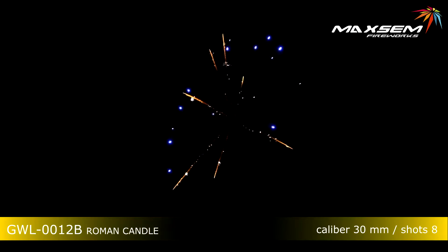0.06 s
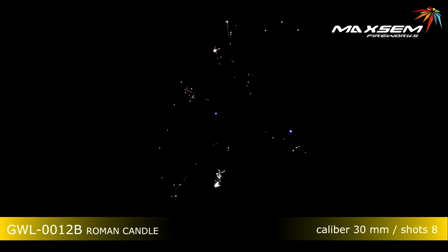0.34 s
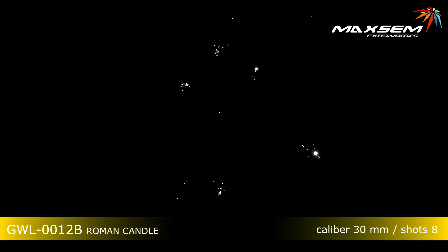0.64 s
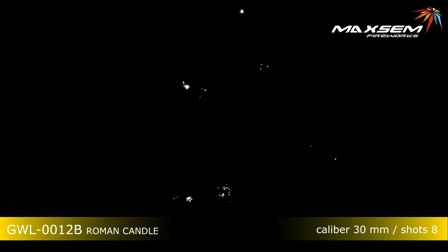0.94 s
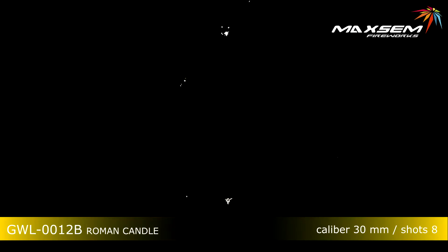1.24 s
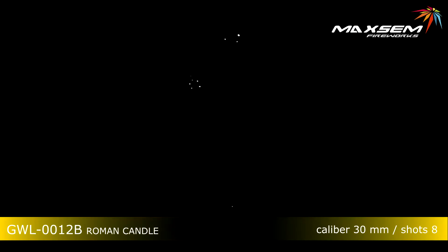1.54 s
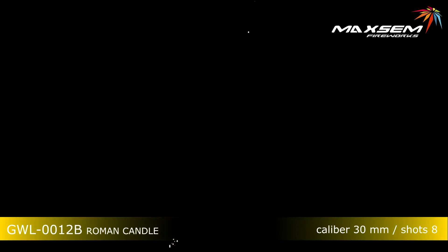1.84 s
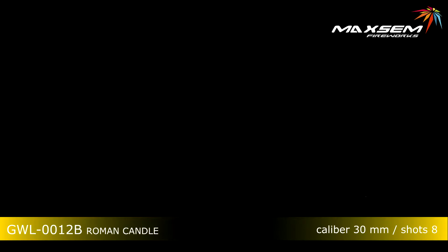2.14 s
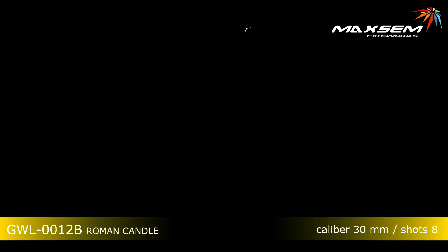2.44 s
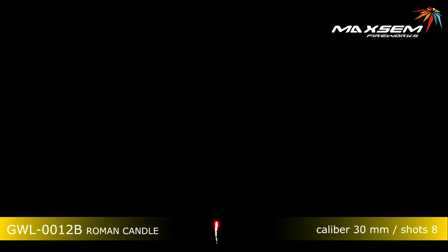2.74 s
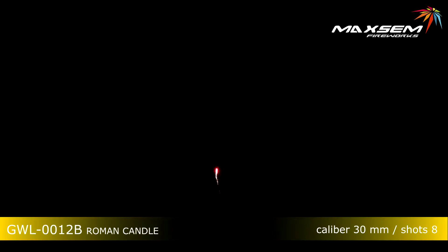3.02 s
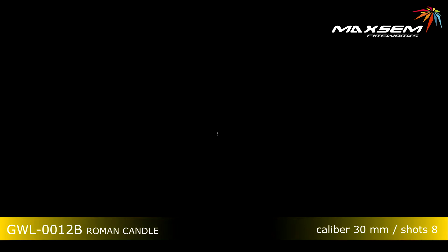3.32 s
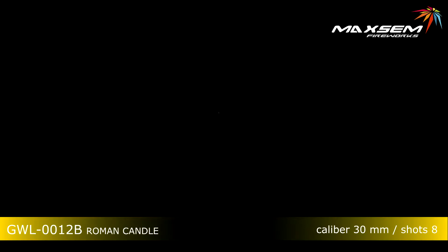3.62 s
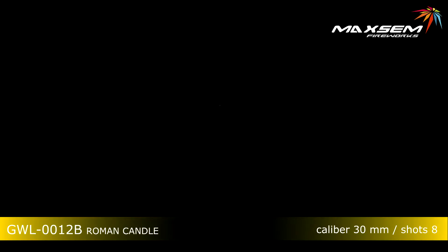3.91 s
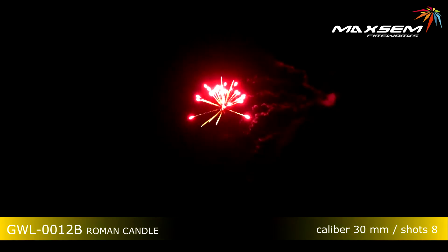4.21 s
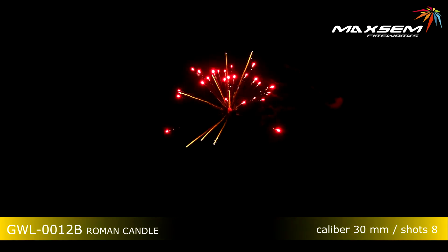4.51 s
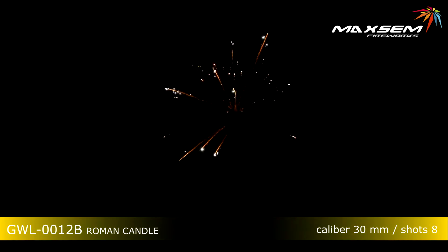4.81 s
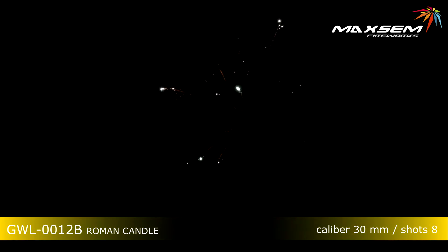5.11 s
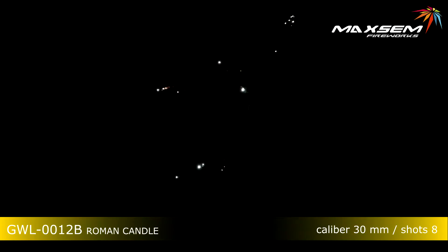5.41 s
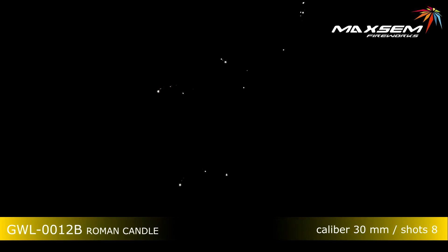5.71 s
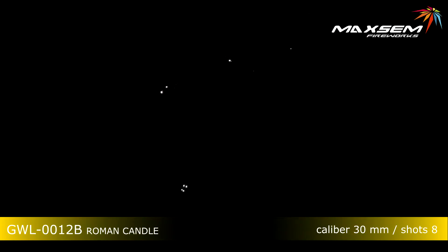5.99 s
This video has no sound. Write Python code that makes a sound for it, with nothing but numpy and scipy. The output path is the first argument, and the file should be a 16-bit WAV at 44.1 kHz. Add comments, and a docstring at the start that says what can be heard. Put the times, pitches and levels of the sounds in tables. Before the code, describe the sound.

The sound opens outdoors at night on the rolling echo of a firework that has just burst. Its stars fizz and crackle in sharp, irregular snaps, thickest around 1 second and thinning out by about 2 seconds. At 2.4 seconds a roman candle fires its next shot with a ringing snap, a thump and a brief rush of gas, followed by a short echo. One last loud crack comes at 2.7 seconds. A lull follows, with a few faint distant pops around 3 and 4 seconds. At 4.4 seconds the shell bursts overhead with a loud bang that rolls away across the land. Its stars fizz softly from about 4.7 seconds and fade by 6, without crackling. Underneath lies a quiet, steady outdoor hum, with very faint insect-like chirps in the second half. The single microphone overloads on the bangs and feeds only the right channel.

```python
"""A roman candle outdoors at night. Over the murmur of the land, a shell that has just burst rolls away
while its stars fizz and crackle, each crack a tiny shock wave. At 2.4 s the tube fires the next shot:
a ringing snap, a thump and a rush of gas. Two seconds later that shell bursts overhead, echoes off the
land and leaves its stars fizzing, with faint insect-like chirps underneath.
One microphone, overloaded by the bangs, feeds the right channel only."""
import sys
import numpy as np
from scipy import signal
from scipy.io import wavfile

SR = 44100
rng = np.random.default_rng(int(sys.argv[2]) if len(sys.argv) > 2 else 0)


def to_wav(s):
    """Save 16-bit WAV."""
    ch = np.atleast_2d(s).T  # columns
    pcm = np.round(np.clip(ch, -1, 1) * 32767)  # PCM
    wavfile.write(sys.argv[1], SR, pcm.astype(np.int16))


N = 271215

# Levels are mix settings ahead of the preamp; a spectrum sets tone colour only.
# murmur of the open land: f/Hz, level/dB
NIGHT_SPECTRUM = [(25, -19), (82, -2.5), (111, -8), (340, -7.5), (545, -6.5), (900, -3.5), (1250, -9.5),
                  (1560, -8), (2200, -24.5), (5000, -41), (6400, -32.5), (7600, -38.5), (16000, -43)]
# shell bursts, the first just before the scene opens: t/s, roll level/dB, fizz level/dB
SHELL_BURSTS = [(-.255, -21, -34), (4.3892, -23, -37)]
# rolling echo from near slopes: f/Hz, level/dB
NEAR_ROLL_SPECTRUM = [(40, -32), (118, -16.5), (170, -6.5), (300, -9.5), (430, -5.5), (620, -11.5),
                      (780, -22.5), (1400, -20), (1900, -32.5), (4400, -24.5), (5000, -28), (6600, -29),
                      (11600, -41), (16000, -58)]
# tones that stand out in the near roll: f/Hz, width/octaves, boost/dB
NEAR_ROLL_PEAKS = [(252, 0.12, 8.5), (531.4, 0.038, 6), (1350, 0.06, 2.5)]
# rolling echo from far slopes: f/Hz, level/dB
FAR_ROLL_SPECTRUM = [(40, -22), (130, -3), (230, 1.5), (350, -3.5), (550, 2), (780, -7), (1000, -4),
                     (1150, -13), (1430, -1.5), (1900, -17.5), (4400, -17.5), (5000, -28.5), (6500, -23),
                     (16000, -44.5)]
# fizz of burning stars: f/Hz, level/dB
FIZZ_SPECTRUM = [(600, -24.5), (1100, 1.5), (1500, -1), (1900, -3.5), (3000, -2.5), (4400, -4), (5000, -9),
                 (6500, -9), (10000, -23), (16000, -42.5)]
# loud cracks of the stars: t/s, level/dB
STAR_CRACKS = [(0.0806, -24), (0.1975, -10.0), (0.2386, -14.5), (0.2683, -16.0), (0.391, -12.0),
               (0.4075, -14), (0.4231, -9), (0.4563, -16.5), (0.464, -12), (0.4771, -12.5), (0.5414, -10.0),
               (0.5475, -5), (0.6022, -15.0), (0.6269, -9), (0.6561, -9), (0.673, -6), (0.696, -9),
               (0.7433, -14), (0.7561, -5), (0.7757, -5), (0.7859, -5), (0.7938, -7.5), (0.8131, -4.5),
               (0.855, -9), (0.8993, -8.5), (0.9092, -9), (0.9161, -4), (0.9367, -10), (0.9793, -2),
               (1.0073, -9), (1.0378, -10.0), (1.0463, -13.5), (1.0651, -3.0), (1.1022, -9), (1.117, -10.5),
               (1.1264, -10.5), (1.2291, -6), (1.245, -11.5), (1.2553, -2), (1.3451, -14), (1.3567, -14.5),
               (1.4902, -12.5), (1.5069, -6.5), (1.5595, -9.5), (1.5641, -8.5), (1.6965, -1.5),
               (1.774, -21.5), (1.9089, -15.5), (1.919, -10), (2.0027, -12.5), (2.0067, -3.5),
               (2.1446, -2.5), (2.657, -20.5), (2.7385, -2)]
# haze that grass and trees return after a crack: f/Hz, level/dB
HAZE_SPECTRUM = [(200, -10.5), (1000, 13), (2000, 1.5), (4200, -0.5), (5000, -5), (6500, -4.5), (10000, -4),
                 (16000, -17)]
# hissy slaps of a crack off tree lines: delay/s, level/dB, half-width/s
CRACK_SLAPS = [(.265, -69, .035), (.554, -67, .025)]
# diffuse slaps of a burst off far tree lines: delay/s, level/dB, f/Hz, half-width/s
BURST_SLAPS = [(.052, -21.5, 315, 0.015), (0.093, -42, 6000, 0.016), (.158, -27.5, 300, .04),
               (.15, -33, 814, 0.053), (.42, -33, 1000, 0.023), (.454, -33, 710, 0.014),
               (1.43, -49.5, 496, 0.082)]
# brief ring of the crack at the muzzle: f/Hz, level/dB, t60/s
MUZZLE_RING = [(3700, -7.5, .012), (4400, 1, .012), (5315, -11, .014)]
# echo of the launch from things nearby: f/Hz, level/dB
LAUNCH_ECHO_SPECTRUM = [(50, -19), (130, -7.5), (215, 0), (400, -17), (580, -7.5), (783, -12), (1540, -12),
                        (2210, -16.5), (4450, -14.5), (10900, -35.5), (16000, -51.5)]
# diffuse slaps of the launch: delay/s, level/dB, f/Hz, half-width/s
LAUNCH_TREE_SLAPS = [(.115, -41, 200, 0.038), (.07, -45.5, 560, 0.022), (0.48, -49.5, 1150, 0.058)]
# faint pops far away: t/s, level/dB, f/Hz, t60/s
DISTANT_POPS = [(2.89, -32, 3370, 0.011), (3.005, -37.5, 616, 0.04), (3.922, -42, 560, 0.2),
                (3.949, -43, 730, 0.086), (4.026, -37, 1300, 0.036)]
# thin chirps: t/s, level/dB
THIN_CHIRPS = [(3.736, -71.5), (4.201, -71.5), (5.064, -68), (5.312, -73), (5.57, -71), (5.95, -69)]
# the two bands of a chirp: low f/Hz, high f/Hz, level/dB
CHIRP_BANDS = [(6200, 6900, 2.5), (11000, 12700, -6)]
# a burst's shock wave, direct, off the ground and off far obstacles:
# delay/s, level/dB, length/s, low-pass f/Hz
SHOCK_PATHS = [(0, 8.5, 0.0016, 9200), (.0033, -8.5, 0.00186, 1490), (.0076, 13.5, 0.00177, 5030),
               (0.0103, 0, 0.00255, 2500), (0.065, -10, 0.0028, 1800), (.081, -12.5, .0035, 3980),
               (.168, -25, 0.0031, 910), (.191, -15, 0.00267, 1000)]

LAUNCH_S = 2.4013


def from_db(db):
    """Decibels to gain."""
    return 10 ** (np.asarray(db) / 20)


def rms_one(x):
    """Scale to rms 1."""
    return x / np.sqrt(np.mean(x ** 2) + 1e-20)


def since(s):
    """Seconds elapsed since a cue, for every sample."""
    return np.arange(N) / SR - s


def cut(x, hz, kind, order=2):
    """Butterworth filter."""
    sections = signal.butter(order, np.clip(hz, 10, .45 * SR), kind, fs=SR, output="sos")
    return signal.sosfilt(sections, x + 1e-18)


def add(out, s, sound):
    """Mix in a short sound at its cue; cues before time zero are skipped."""
    i = round(s * SR)
    if i >= 0:
        out[i:i + len(sound)] += sound[:N - i]


def noise(spectrum, start_s=0, dulling=0, peaks=()):
    """Coloured noise that darkens from start_s on, by `dulling` dB per kHz each second."""
    hz, s, frames = signal.stft(rng.standard_normal(N), SR, nperseg=2048)
    octave, points = np.log2(hz + 1), np.array(spectrum)
    db = np.interp(octave, np.log2(points[:, 0]), points[:, 1])
    for peak_hz, width, peak_db in peaks:
        db = db + peak_db * np.exp(-((octave - np.log2(peak_hz)) / width) ** 2)
    loss_db = dulling * np.outer(hz / 1000, np.maximum(s - start_s, 0))
    gain = rms_one(from_db(db))[:, None] * from_db(-loss_db)
    return signal.istft(frames * gain)[1][:N]


def tail(s, rise_s, db_per_decade, db_per_s=0):
    """Envelope: a linear attack, then a fall with each tenfold of time and an optional steady fade."""
    t = np.maximum(since(s), 0)
    age = t / rise_s
    return np.minimum(age, 1) * from_db(-db_per_decade * np.log10(np.maximum(age, 1)) - db_per_s * t)


def flutter(depth_db, rate_hz):
    """Random swelling and sinking of a level."""
    return from_db(depth_db * rms_one(cut(rng.standard_normal(N), rate_hz, "low")))


def puff(t, band_hz, db, t60):
    """Band noise with an instant attack that dies away."""
    return rms_one(cut(rng.standard_normal(len(t)), band_hz, "band")) * from_db(db - 60 * t / t60)


def swell(s, db, band_hz, half_width_s):
    """Band noise that fades in and out around a cue."""
    band = rms_one(cut(rng.standard_normal(N), band_hz, "band"))
    return from_db(db) * band * np.exp(-(since(s) / half_width_s) ** 2)


def n_wave(t, length_s):
    """A shock wave: pressure jumps up, falls through zero and jumps back."""
    phase = np.clip(t / length_s, 0, 1)
    return np.diff(phase * (1 - phase), prepend=0) * length_s * SR   # mean pressure over each sample


def ring(x, hz, t60):
    """A resonator: a click sets a decaying sine ringing."""
    r, w = from_db(-60 / (t60 * SR)), 2 * np.pi * hz / SR
    return signal.lfilter([0, np.sin(w)], [1, -2 * r * np.cos(w), r * r], x + 1e-18)


def night():
    """The bed: a steady, distant murmur of open land."""
    return from_db(-52) * noise(NIGHT_SPECTRUM)


def roll(burst_s, level_db, near_s=.54):
    """Echoes pile into a lumpy roll as more land answers, then sink as far slopes take over from near."""
    near_share = np.exp(-(since(burst_s) / near_s) ** 2)
    near = np.sqrt(near_share) * noise(NEAR_ROLL_SPECTRUM, burst_s, dulling=1, peaks=NEAR_ROLL_PEAKS)
    far = np.sqrt(1 - near_share) * noise(FAR_ROLL_SPECTRUM, burst_s, dulling=1.57)
    envelope = from_db(level_db) * tail(burst_s, rise_s=.078, db_per_decade=21.5)
    return envelope * (near + far) * flutter(depth_db=2, rate_hz=74.2)


def burning(burst_s, level_db, catch_s=.28):
    """Envelope of the stars: they catch just after the burst, flare up and burn down."""
    return from_db(level_db) * tail(burst_s + catch_s, rise_s=.06, db_per_decade=7, db_per_s=10)


def fizz(burst_s, level_db):
    """The burning stars fizz, duller as they fly apart."""
    hiss = noise(FIZZ_SPECTRUM, burst_s, dulling=1.76)
    return burning(burst_s, level_db) * hiss * flutter(depth_db=1.5, rate_hz=410)


def sparks(envelope, per_s, level_db):
    """Tiny grains pop at random, bright ticks that ride the given envelope."""
    sizes = from_db(5.8 * np.minimum(rng.exponential(1, N), 3))
    clicks = (rng.random(N) < per_s / SR) * sizes * envelope
    return from_db(level_db) * cut(clicks, [3000, 9000], "band")


def grains(climax_s=.8, half_width_s=.8):
    """Crackle cues (t/s, level/dB): a crack may set off a weaker grain, most surely at the climax."""
    cues = []
    for s, db in STAR_CRACKS:
        luck, wait_s, offset_db = rng.random(), rng.uniform(.0032, .011), rng.normal(-14.5, 3)
        cues.append((s, db))
        if luck < np.exp(-((s - climax_s) / half_width_s) ** 2):
            cues.append((s + wait_s, db + offset_db))
    return cues


def crackle(shock_s=.00012, gas_s=.00022, direct_db=.82, ground_db=-9):
    """Each grain explodes as a tiny shock wave with a puff of gas; the ground bounces it back."""
    out, t = np.zeros(N), np.arange(SR // 16) / SR
    for s, db in grains():
        bounce_s = .0078 - .0011 * s + .0008 * rng.standard_normal()   # ever sooner as the stars sink
        size, force = np.exp(rng.normal(0, [.15, .4]))
        gas = .15 * force * (1 - t / gas_s) * np.exp(-t / gas_s)
        snap = cut(n_wave(t, shock_s * size) + gas, 8700, "low")
        scatter = puff(t, [2600, 7500], db=-17.5, t60=.0086)   # off things close to the microphone
        crack = snap / np.abs(snap).max() + scatter
        # the ground scatters it longer, with more body
        grass = puff(t, [500, 1800], db=-17, t60=.038) + puff(t, [2200, 7000], db=-17, t60=.038)
        bounce = cut(crack, 6000, "low", order=1) + grass
        add(out, s, from_db(db + direct_db) * crack)
        add(out, s + bounce_s, from_db(db + ground_db) * bounce)
    return out


def land_echo(cracks):
    """Grass and trees send back a faint haze that dulls with distance, and two soft slaps."""
    envelope = from_db(-52) * tail(0, rise_s=.02, db_per_decade=14, db_per_s=2)
    haze = envelope * noise(HAZE_SPECTRUM, dulling=2.5)
    slaps = sum(swell(delay, db, [2800, 8900], width) for delay, db, width in CRACK_SLAPS)
    return signal.fftconvolve(cracks, (haze + slaps)[:SR])[:N]


def tree_slaps(bang_s, slaps):
    """Tree lines smear the echoes of a bang into swells of noise."""
    swells = sum(swell(bang_s + delay, db, [hz / 1.58, hz * 1.35], width)
                 for delay, db, hz, width in slaps)
    return (since(bang_s) > 0) * swells


def launch(gap_s=.001):
    """The lift charge: a ringing double crack at the muzzle, the thump and rush of gas leaving the tube."""
    out, t = np.zeros(N), np.arange(SR // 8) / SR
    click = signal.unit_impulse(len(t))
    crack = sum(from_db(db) * ring(click, hz, t60) for hz, db, t60 in MUZZLE_RING)
    tube_ring = from_db(-13) * ring(click, hz=1500, t60=.035)   # the air in the tube
    rush = puff(t, [300, 3500], db=-18, t60=.025)
    thump = from_db(-14) * ring(click, hz=230, t60=.035)   # the air column's low note
    push = from_db(-19) * cut(n_wave(t, length_s=.0049), 480, "low")   # expanding gas, bass only
    ground_scatter = puff(t, [200, 600], db=-30, t60=.08)
    add(out, LAUNCH_S, crack + tube_ring + ground_scatter)
    add(out, LAUNCH_S + gap_s, crack + rush - thump - push)
    return out


def launch_echo():
    """The surroundings answer the launch, brightening as they fade, while sparks spit from the tube."""
    envelope = from_db(-37.5) * tail(LAUNCH_S, rise_s=.076, db_per_decade=28.5)
    wash = noise(LAUNCH_ECHO_SPECTRUM, LAUNCH_S, dulling=-.5) * flutter(depth_db=2, rate_hz=220)
    slaps = tree_slaps(LAUNCH_S, LAUNCH_TREE_SLAPS)
    return envelope * wash + slaps + sparks(envelope, per_s=100, level_db=8.5)


def far_pops(band_ratio=1.28):
    """Faint pops in the distance, each a narrow puff of noise."""
    out, t = np.zeros(N), np.arange(SR // 4) / SR
    for s, db, hz, t60 in DISTANT_POPS:
        add(out, s, puff(t, [hz / band_ratio, hz * band_ratio], db, t60))
    return out


def chirps():
    """Thin chirps, as of an insect: short swells in two high bands."""
    return sum(swell(s, db + band_db, [low, high], half_width_s=.025)
               for s, db in THIN_CHIRPS for low, high, band_db in CHIRP_BANDS)


def bang(burst_s):
    """The shell's shock wave arrives along every path, with scatter for body and sizzle."""
    out, t = np.zeros(N), np.arange(SR // 8) / SR
    for delay, db, length_s, top_hz in SHOCK_PATHS:
        body = puff(t, [200, 620], db=-23, t60=.046)
        sizzle = puff(t, [1200, 10000], db=-27, t60=.058)
        low_cut_hz = 170 if delay > .03 else 110   # far obstacles return less deep bass
        wave = cut(n_wave(t, length_s) + body + sizzle, low_cut_hz, "high")
        add(out, burst_s + delay, from_db(db) * cut(wave, top_hz, "low", order=1))
    return out


def scene():
    """Everything reaches one microphone, on the right channel; only the first shell's stars crackle."""
    first_s, _, first_fizz_db = SHELL_BURSTS[0]
    cracks = crackle() + sparks(burning(first_s, first_fizz_db), per_s=130, level_db=11)
    shells = sum(bang(s) + tree_slaps(s, BURST_SLAPS) + roll(s, roll_db) + fizz(s, fizz_db)
                 for s, roll_db, fizz_db in SHELL_BURSTS)
    firework = shells + cracks + land_echo(cracks) + launch() + launch_echo()
    ambience = night() + far_pops() + chirps()
    return np.stack([np.zeros(N), firework + ambience])


def record(dry, preamp_db=6, hiss_db=-93, top_hz=16500):
    """The preamp clips the bangs and adds a trace of hiss; the top end is cut."""
    clipped = np.clip(dry * from_db(preamp_db), -.9, .9)
    hiss = from_db(hiss_db) * rng.standard_normal((2, N))
    low_pass = signal.firwin(129, top_hz, fs=SR)
    return signal.fftconvolve(clipped + hiss, low_pass[None], "same", axes=1)


dry = scene()
out = record(dry)
to_wav(out)
```